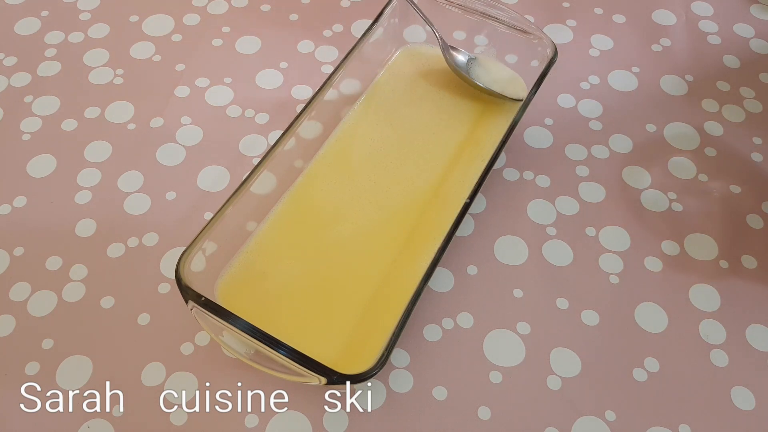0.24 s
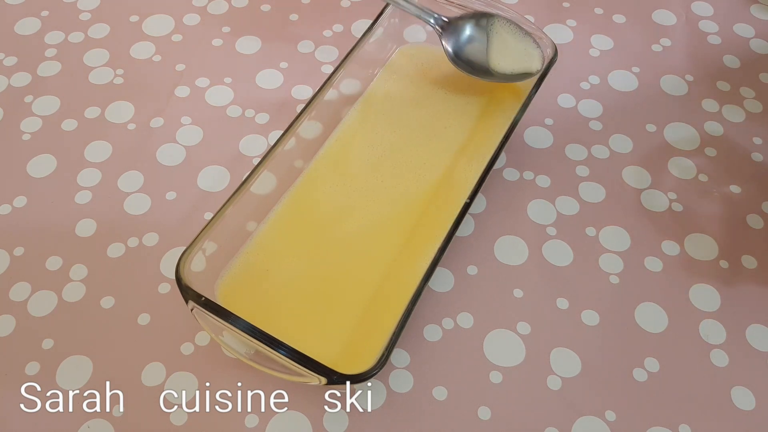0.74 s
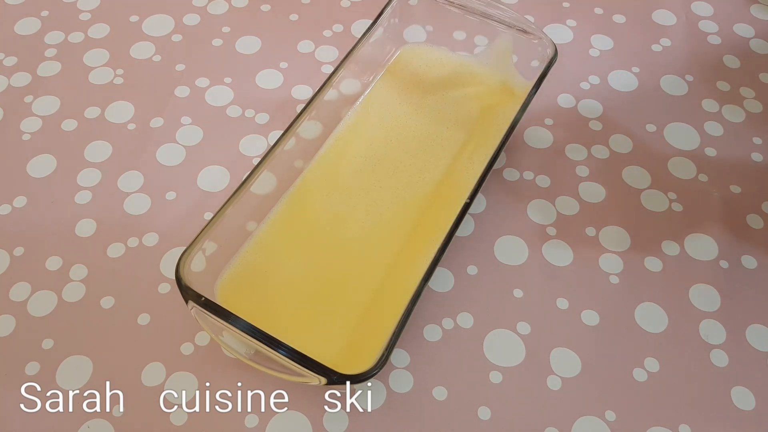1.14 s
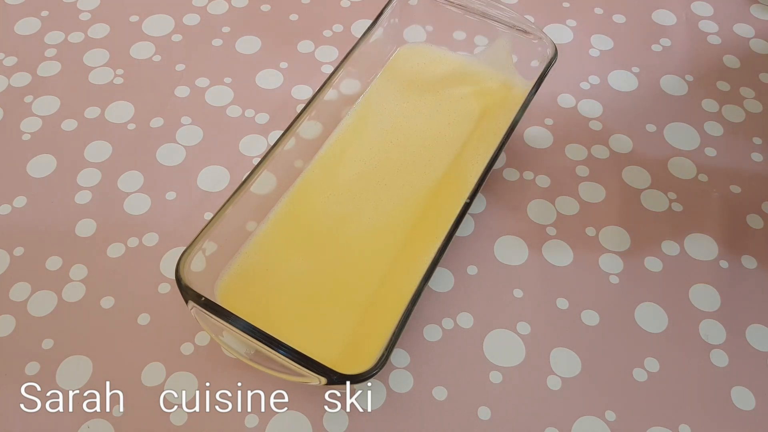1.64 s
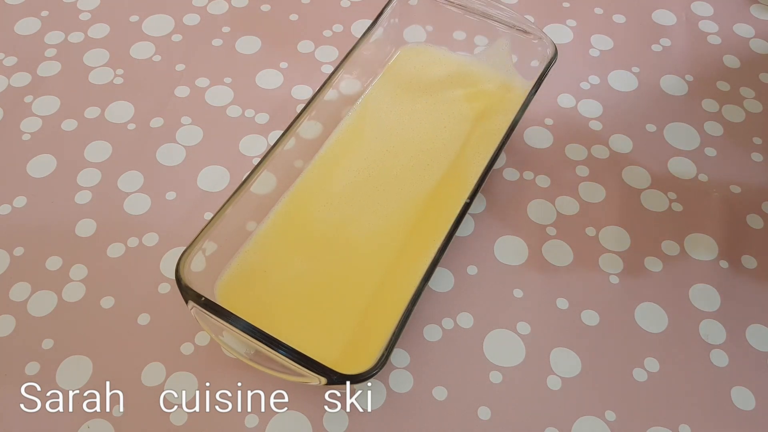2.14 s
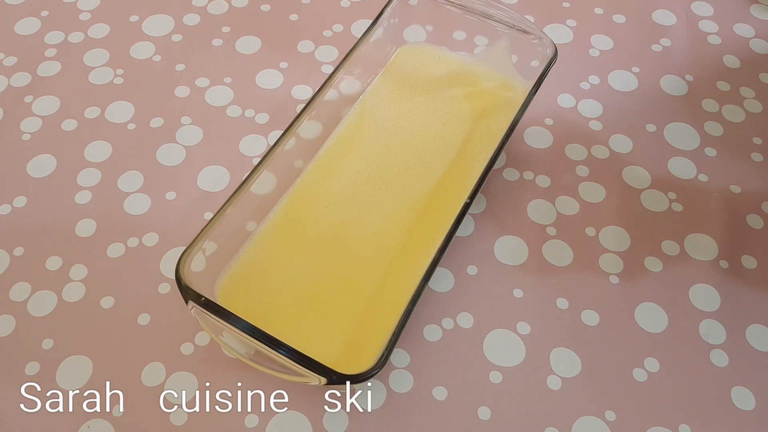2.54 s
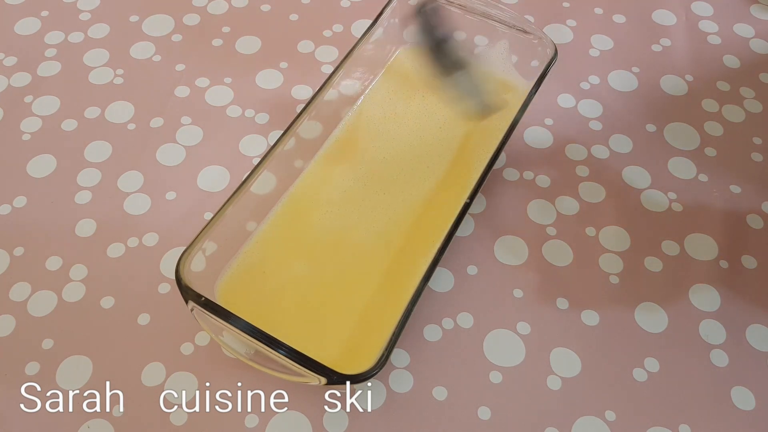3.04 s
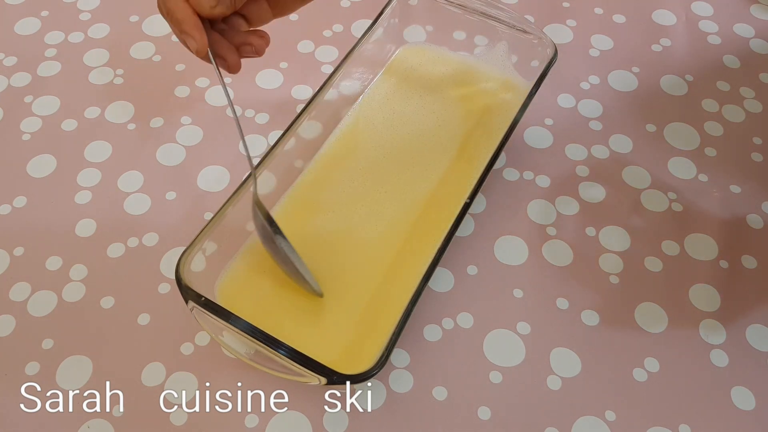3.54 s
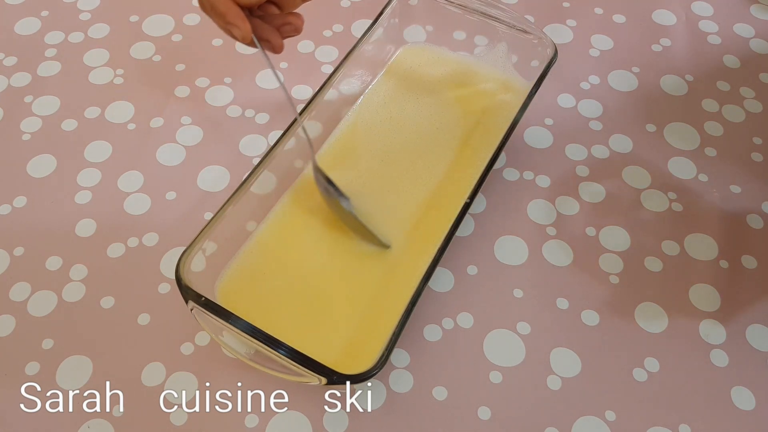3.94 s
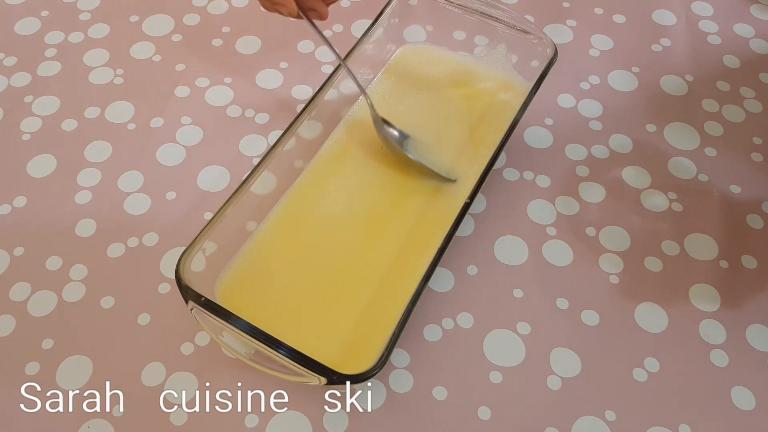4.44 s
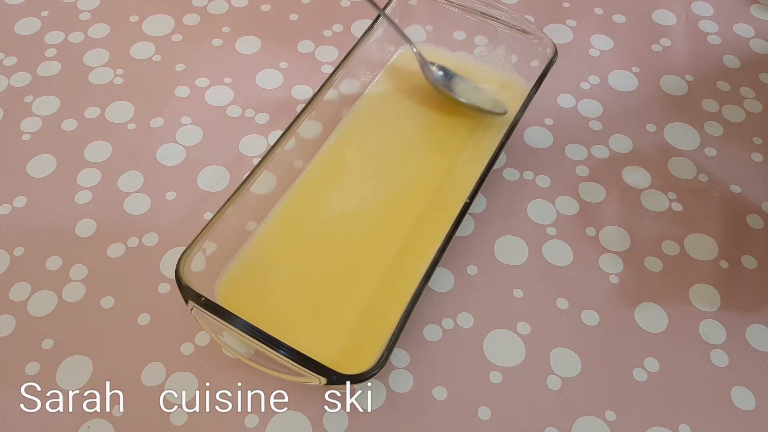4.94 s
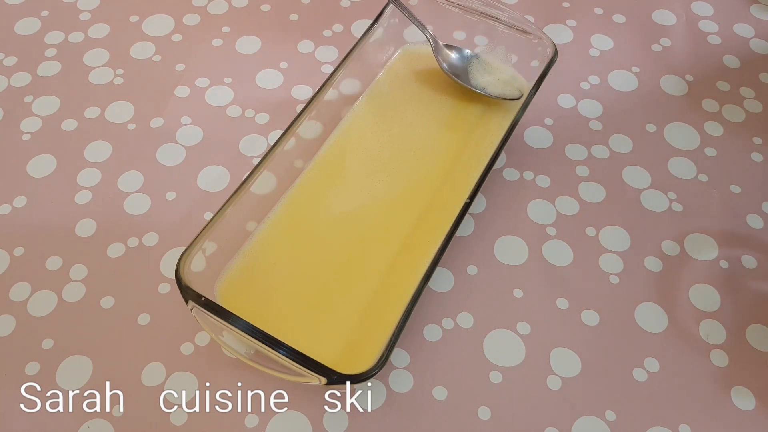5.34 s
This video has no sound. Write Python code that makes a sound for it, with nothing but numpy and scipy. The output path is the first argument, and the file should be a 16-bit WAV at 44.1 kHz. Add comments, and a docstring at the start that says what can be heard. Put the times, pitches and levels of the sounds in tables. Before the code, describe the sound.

Close stereo recording in a home kitchen with a low rumble. A spoon gives a quick irregular run of clinks on a filled glass dish, slightly left, then foam hisses faintly. Three sharp, evenly spaced raps on a rim follow to the right, and the background dips afterwards and slowly returns. Small birds chirp far off. Near the end come a soft metallic slide, a foam hiss and more dish clinks.

```python
"""A metal spoon skims foam off custard in a glass baking dish: it clinks against the wall, then the foam hisses.
The spoon is rapped clean three times on a rim off to the right; the recorder's gain sinks and creeps back.
Later something metal slides softly across the room, then the foam hisses and the dish clinks once more.
Throughout, a low rumble fills the kitchen and small birds call now and then, far off.
Knocks are cracks plus ringing modes, hisses are shaped noise, bird notes are gliding tones; rooms are echoes."""
import sys
import numpy as np
from scipy import signal
from scipy.fft import rfft, irfft
from scipy.io import wavfile
from scipy.ndimage import uniform_filter1d, minimum_filter1d

SR = 44100
rng = np.random.default_rng(int(sys.argv[2]) if len(sys.argv) > 2 else 0)


def store_wav(level_fs):
    """Save 16-bit WAV to argv[1]."""
    pcm = np.round(np.clip(np.atleast_2d(level_fs), -1, 1) * 32767)
    wavfile.write(sys.argv[1], SR, pcm.T.astype(np.int16))


N = 245895  # length in samples

# how long the kitchen's echoes take to die by 60 dB: (f/Hz, decay time/s)
KITCHEN_DECAY = [(200, 1), (1500, 0.54), (3500, 0.55), (6000, 0.53), (9000, 0.42), (14000, 0.27)]


def gain_of(db):
    """Turns decibels into an amplitude factor."""
    return 10 ** (np.asarray(db) / 20)


def evened(x):
    """Scales a sound to an rms of 1."""
    return x / np.sqrt(np.mean(x ** 2) + 1e-20)


def read(points, hz):
    """Reads a table between its points, along a log-frequency axis."""
    f, value = np.transpose(points)
    return np.interp(np.log(hz + 1), np.log(f + 1), value)


def add(mix, s, sound):
    """Adds a stereo sound to the mix at time s, in seconds."""
    part = mix[:, max(round(s * SR), 0):][:, :sound.shape[1]]
    part += sound[:, :part.shape[1]]


def panned(db):
    """Left and right gains for a level difference; positive leans left."""
    return gain_of([[db / 2], [-db / 2]])


def wander(rate_hz):
    """Slow random motion of rms 1: noise with its fast part smoothed away."""
    hz = np.fft.rfftfreq(N, 1 / SR)
    slow = rfft(rng.standard_normal(N)) * np.exp(-(hz / rate_hz) ** 2)
    return evened(irfft(slow, N))


def causal(db, size=4096):
    """The sharpest click with a given spectrum: minimum phase packs its energy at the start."""
    log_gain = np.log(gain_of(np.concatenate([db, db[-2:0:-1]])))
    spectrum = np.exp(np.conj(signal.hilbert(log_gain)))[:len(db)]
    return irfft(spectrum)[:size // 2]


def room(x, t60s, early_db, early_s, gap_s):
    """Sparse reflections of random sign: strong early ones from near surfaces, then a tail dying band by band."""
    taps = np.zeros((2, SR))
    # one reflection at a random place in every 10 samples
    at = np.arange(0, SR - 10, 10) + rng.integers(0, 10, (2, (SR - 1) // 10))
    np.put_along_axis(taps, at, rng.choice([-1., 1.], at.shape), 1)
    hz, t, bands = signal.stft(taps, SR, nperseg=256)
    decay = gain_of(-60 * t / read(t60s, hz)[:, None])
    tail = signal.istft(bands * decay, SR, nperseg=256)[1]
    t = np.arange(tail.shape[1]) / SR
    early = 1 + gain_of(early_db) * np.exp(-t / early_s)
    tail = tail / np.linalg.norm(tail[0]) * early * (t > gap_s)
    return signal.fftconvolve(x, tail, axes=1)[:, :N]


def drone():
    """A deep, wavering tone that swells from its resting level and sinks back."""
    # (peak t/s, level/dB, rise/(dB/s), fall/(dB/s))
    swells = [(2.22, -45.5, 19, 60), (4.65, -57, 21.5, 10)]
    pitch_hz, rest_db, waver_db = 42.4, -67, 2
    t = np.arange(N) / SR
    level = gain_of(rest_db)
    for s, db, rise, fall in swells:
        level = level + gain_of(db - np.maximum(rise * (s - t), fall * (t - s)))
    hz = pitch_hz * (1 + 0.013 * wander(3))
    tone = np.sqrt(2) * np.sin(2 * np.pi * np.cumsum(hz) / SR)
    return level * gain_of(waver_db * wander(rate_hz=4)) * tone


def hum():
    """Steady pitches that waver: each carrier is blurred by slow random motion."""
    # (f/Hz, level/dB)
    hum_lines = [(97, -55), (158, -57), (199, -59), (218, -60), (298, -66)]
    t = np.arange(N) / SR
    total = np.zeros(N)
    for f, db in hum_lines:
        motion = wander(8) + 1j * wander(8)
        total += gain_of(db) * (motion * np.exp(2j * np.pi * f * t)).real
    return total


def rumble():
    """Low rumble with faint hiss: noise coloured band by band, its level slightly patchy."""
    # colour of the noise: (f/Hz, relative level per Hz/dB)
    noise_colour = [(24, -42), (45, -10), (75, -15), (100, -4), (135, -6), (220, -4), (330, -9), (570, -7),
                    (760, -26), (1100, -26), (1700, -32), (2800, -37), (4300, -28), (5600, -36),
                    (7500, -42), (14000, -41)]
    # how alike the left and right sides are: (f/Hz, likeness from 0 to 1)
    likeness = [(40, 0.82), (140, 0.83), (280, 0.89), (600, 0.52), (1200, 0.1), (8000, 0.055)]
    frames, hz = N // 512 + 5, np.fft.rfftfreq(2048, 1 / SR)
    a, b, c, d, patches = rng.standard_normal((5, frames, len(hz)))
    patches = uniform_filter1d(patches, size=10, axis=0)
    patches = evened(uniform_filter1d(patches, size=8, axis=1))
    same = np.clip(read(likeness, hz), -1, 1)
    left = a + 1j * b
    right = same * left + np.sqrt(1 - same ** 2) * (c + 1j * d)
    bands = np.array([left, right]) * gain_of(read(noise_colour, hz) + 0.77 * patches)
    return evened(signal.istft(bands.transpose(0, 2, 1), nperseg=2048, noverlap=1536)[1][:, :N])


def background():
    """Rumble, hum and drone together, leaning slightly left."""
    return panned(1.2) * (gain_of(-50.0) * rumble() + hum() + drone())


def birds():
    """Diving chirps and drooping whistles: fluttering sine tones, far off and heard only as echo."""
    # one bird repeats a buzzy chirp that dives and levels off:
    # (t/s, length/s, start f/Hz, end f/Hz, level before the echo/dB)
    chirps = [(1.868, .125, 5700, 2750, -57), (3.157, .1, 5300, 2750, -57.5),
              (3.525, .13, 4900, 2850, -58.5), (4.855, .13, 5100, 2750, -59.5),
              (5.422, .15, 4800, 2850, -58)]
    # thin whistles, held and then dropped:
    # (t/s, length/s, f/Hz, drop as share of the pitch, buzz from 0 to 1, level before the echo/dB)
    whistles = [(.56, .14, 6300, .03, .035, -71), (.66, .14, 5600, .25, .11, -70),
                (1.09, .2, 5100, .2, .14, -71), (1.492, .068, 3650, .03, .055, -58),
                (1.64, .2, 2960, .01, .02, -79), (3.02, .15, 4900, .03, .1, -72),
                (3.36, .13, 4900, .13, .14, -70), (3.56, .22, 8800, .1, .06, -78),
                (3.63, .117, 3055, .0088, .015, -67), (3.775, .1, 5680, .01, .025, -77),
                (3.87, .12, 4950, .24, .04, -71)]
    # how long the outdoor echoes take to die by 60 dB: (f/Hz, decay time/s)
    yard_decay = [(2000, .65), (4000, .95), (8000, .65)]
    dive_s, dive_hold = .05, 1.4  # speed of a chirp's dive; a higher power delays it
    chirp_buzz, buzz_fade_s = 0.135, .085  # pitch flutter at the start, and how fast it clears
    whistle_hold = 2  # a higher power holds the pitch longer before the drop
    attack_s, release_s = 0.022, 0.025
    song, waver = np.zeros((2, N)), wander(rate_hz=590)

    def sing(s, t, hz, buzz, db):
        """One note: a fluttering sine with attack, hold and release."""
        hz = hz * (1 + buzz * np.roll(waver, -round(s * SR))[:len(t)])
        shape = np.minimum(t / attack_s, 1) * np.minimum((t[-1] - t) / release_s, 1)
        note = gain_of(db) * shape * np.sin(2 * np.pi * np.cumsum(hz) / SR)
        add(song, s, np.array([note, note]))

    for s, length, start_hz, end_hz, db in chirps:
        t = np.arange(0, length, 1 / SR)
        hz = end_hz + (start_hz - end_hz) * np.exp(-(t / dive_s) ** dive_hold)
        sing(s, t, hz, chirp_buzz * np.exp(-t / buzz_fade_s), db)
    for s, length, pitch_hz, drop, buzz, db in whistles:
        t = np.arange(0, length, 1 / SR)
        hz = pitch_hz * (1 - drop * (t / length) ** whistle_hold)
        sing(s, t, hz, buzz, db)
    return gain_of(11) * room(song, yard_decay, early_db=-2, early_s=0.035, gap_s=0.00033)


def slide():
    """Metal slides softly over metal across the room: friction hiss sings in a row of narrow modes."""
    # the one stroke: (start t/s, rise/s, hold/s, fall/(dB/s), direct level/dB)
    start, rise, hold, fall_db_per_s, db = (4.285, .08, .12, 90, -53)
    # colour of the friction: (f/Hz, relative level per Hz/dB)
    hiss_colour = [(500, -20), (1200, -6), (1800, 2), (2500, 5), (3000, -8), (4200, 1), (6000, -6),
                   (7100, -12), (7800, -6), (10000, -8), (14000, -13)]
    # modes that sing: (f/Hz, level over the hiss/dB)
    singing_modes = [(2540, 8), (3175, 8), (3910, 10), (5990, 11), (6290, 14), (6910, 13), (7560, 12),
                     (7970, 11), (8750, 10), (9650, 12), (10000, 13), (11000, 15), (11600, 12), (12000, 10)]
    width_hz = 22
    t, hz = np.arange(N) / SR, np.fft.rfftfreq(N, 1 / SR)
    singing = sum(gain_of(mode_db) / (1 + 2j * (hz - f) / width_hz) for f, mode_db in singing_modes)
    colour = gain_of(read(hiss_colour, hz)) * (1 + singing)
    rub = evened(irfft(rfft(rng.standard_normal((2, N))) * colour, N))
    onset = np.clip((t - start) / rise, 0, 1) ** 2
    fade_db = fall_db_per_s * np.maximum(t - start - rise - hold, 0)
    direct = rub * onset * gain_of(db - fade_db)
    return direct + gain_of(-3) * room(direct, KITCHEN_DECAY, early_db=-6, early_s=.02, gap_s=.004)


def foam(bursts_per_s=6000):
    """Countless tiny bubbles burst while the spoon pushes or lifts the foam: random clicks merge into a hiss."""
    # (peak t/s, rise/s, fall/s, level/dB)
    pushes = [(.8, 0.27, 0.26, -56.5), (5.24, 0.087, 0.037, -54)]
    # colour of the hiss: (f/Hz, relative level per Hz/dB)
    fizz_colour = [(500, -14), (950, -2), (1700, -10), (4500, 0), (8000, -12), (14000, -26)]
    t, hz = np.arange(N) / SR, np.fft.rfftfreq(N, 1 / SR)
    bursts = rng.standard_normal((2, N)) * (rng.random((2, N)) < bursts_per_s / SR)
    fizz = evened(irfft(rfft(bursts) * gain_of(read(fizz_colour, hz)), N))
    level = np.zeros(N)
    for s, rise, fall, db in pushes:
        level += gain_of(db) * np.exp(-np.maximum((s - t) / rise, (t - s) / fall) ** 2)
    return fizz * level


def blows(rows, modes, main_hz, crack, lean, crack_db, shiver_db, shiver_s, right_lead_ms, path_spread_s,
          wet_db, main_wet_db, early_db, early_s):
    """Each blow is a crack plus ringing modes; a softer contact leaves the high ones quiet."""
    in_step_hz, ring_attack_s = 3600, .0002  # modes well below this pitch start in step, higher ones at random
    direct, sent = np.zeros((2, N)), np.zeros((2, N))
    t, hz = np.arange(SR) / SR, np.fft.rfftfreq(4096, 1 / SR)
    mode_hz, mode_db, t60 = np.transpose(modes)
    decay = gain_of(mode_db[:, None] - 60 * t / t60[:, None])
    rings = decay * np.exp(2j * np.pi * mode_hz[:, None] * t) * (1 - np.exp(-t / ring_attack_s))
    is_main, is_high = abs(mode_hz / main_hz - 1) < .07, mode_hz > 4000
    left_lag_ms, right_lag_ms = max(right_lead_ms, 0), max(-right_lead_ms, 0)

    for s, db, bright_hz, hard_db, main_db, high_db in rows:
        def contact_db(f):
            """Treble lost to a soft contact."""
            return -10 * np.log10(1 + (f / bright_hz) ** 4)

        # close pairs of low modes start in step and then beat
        phase = (mode_hz / in_step_hz) ** 2 * rng.standard_normal(len(modes))
        path_s = path_spread_s * rng.standard_normal((2, 1))  # to each microphone
        turn = np.exp(1j * (phase - 2 * np.pi * mode_hz * path_s))
        # the contact weights the modes
        weight = gain_of(contact_db(mode_hz) + main_db * is_main + high_db * is_high) * turn
        main = ((weight * is_main) @ rings).real
        others = ((weight * ~is_main) @ rings).real
        # bending waves cross the object a few times, drawing the crack out into a shiver of milliseconds
        shiver = rng.standard_normal((2, len(t))) * np.exp(-t / shiver_s)
        shiver *= gain_of(shiver_db) / np.sqrt(shiver_s * SR / 2)
        shiver[:, 0] += 1
        click = causal(read(crack, hz) + contact_db(hz) + crack_db + hard_db)
        clatter = others + signal.oaconvolve(shiver, click[None], axes=1)[:, :len(t)]
        # the main ring is heard mostly direct, so its beats stay deep
        add(sent, s, gain_of(db) * (clatter + gain_of(main_wet_db) * main))
        for ear, lag_ms in zip(np.eye(2), (left_lag_ms, right_lag_ms)):
            add(direct, s + lag_ms / 1000, gain_of(db) * ear[:, None] * (clatter + main))

    lean_db = read(lean, np.fft.rfftfreq(2 * N, 1 / SR))
    direct = irfft(rfft(direct, 2 * N) * gain_of([lean_db / 2, -lean_db / 2]))[:, :N]
    return direct + gain_of(wet_db) * room(sent, KITCHEN_DECAY, early_db, early_s, gap_s=.002)


def rim_raps():
    """The steel spoon is rapped on a rim to the right: sharp cracks, each with a rebound, and fluttering modes."""
    # raps and rebounds: (t/s, relative level/dB, contact brightness f/Hz,
    # crack boost/dB, main mode boost/dB, high mode boost/dB)
    raps = [(2.2259, -8, 10500, 1, 0, 1), (2.2515, -20.5, 4500, -14, 13.5, -2),
            (2.3698, -7.5, 10000, 2, -1.5, 0), (2.3949, -11, 3900, -7, 7.5, -2),
            (2.5333, -9, 11500, 4.5, 0, 2), (2.55945, -24, 3500, -16, 11, 0)]
    # modes of the spoon, in close clusters that flutter: (f/Hz, relative level/dB, time to die by 60 dB/s)
    spoon_modes = [(1877, -13, .085), (1913, -14, .095), (1952, -16, .07), (1800, -22, .07),
                   (3396, -21, .06), (5266, -12.5, .11), (8725, -4, .035), (8795, -8, .05),
                   (10260, -19, .05), (13350, -21, .05), (14150, -23, .09), (4150, -17, .035),
                   (4830, -16, .05), (4980, -16, .05), (5120, -18, .04), (5450, -17, .04),
                   (6450, -13, .025), (8400, -14, .03), (8600, -11, .03), (8920, -15, .035),
                   (9170, -19, .05), (10080, -22, .035), (10430, -23, .035), (10750, -21, .04),
                   (13180, -25, .04), (13520, -24, .04)]
    # colour of the first crack of contact: (f/Hz, relative level/dB)
    rim_crack = [(100, -36), (700, -19), (1250, -20), (2200, -8), (3000, -1), (3600, -1), (4500, -8),
                 (5200, -4.5), (6400, -5), (7600, -27), (8500, -12), (9700, -26), (10600, -18),
                 (11800, -35), (13500, -26), (15000, -31)]
    # how far the direct sound leans left; negative leans right: (f/Hz, left-right difference/dB)
    rim_lean = [(1900, -3.5), (4000, -2), (9000, -3)]
    return blows(raps, spoon_modes, 1914, rim_crack, rim_lean, crack_db=29.5, shiver_db=-9, shiver_s=.0018,
                 right_lead_ms=.31, path_spread_s=.00002, wet_db=-8.5, main_wet_db=-1,
                 early_db=-5, early_s=.014)


def dish_clinks():
    """The spoon clinks on the filled glass dish: hard knocks, then chatter, and low modes beating in pairs."""
    # knocks: (t/s, relative level/dB, contact brightness f/Hz,
    # crack boost/dB, main mode boost/dB, high mode boost/dB)
    clinks = [(.0880, -24, 4200, 5, 2.5, 1.5), (.1432, -27.5, 2800, 1, 1.5, 2),
              (.2799, -17.5, 6000, 14, -3.5, -7), (.2895, -26, 5200, 14, -6, -6),
              (.2965, -28, 5200, 14, -10, -6), (.3432, -29, 2600, 2, -1, -6),
              (.4272, -24, 3500, 2.5, -.5, -4), (.930, -60, 9000, 6, -6, 0),
              (5.2544, -15, 5400, 10, -3.5, -8), (5.269, -31, 4500, 15, -8, -10),
              (5.2775, -18.5, 4800, 12, -6, -9), (5.2925, -26, 3200, 10, -6, -10),
              (5.5269, -13.5, 3500, 9, 2, 4)]
    # modes of the filled dish, a faint slow pair lingers: (f/Hz, relative level/dB, time to die by 60 dB/s)
    dish_modes = [(872, -20, .18), (903, -21, .12), (1547, -9.5, .075), (1567, -8, .085), (1557, -32, 1.15),
                  (1566.5, -32, 1.15), (1935, -15, .06), (1965, -16, .06), (2006, -14, .08),
                  (2043, -14.5, .08), (2336, -10, .06), (2374, -13, .05), (2342, -39, .8), (440, -23, .06),
                  (1335, -20, .05), (2130, -17, .04), (2620, -19, .03), (2900, -15, .04), (3030, -11, .06),
                  (3300, -16, .035), (3610, -15, .05), (4130, -13, .04), (4260, -11, .05), (4900, -18, .04),
                  (5330, -13, .06), (5720, -16, .035), (6060, -13, .035), (6700, -14, .03),
                  (9200, -17, .04), (10300, -16, .04), (13600, -19, .05), (14100, -17, .08)]
    # colour of the first crack of contact: (f/Hz, relative level/dB)
    dish_crack = [(100, -32), (450, -19), (750, -24), (1350, -17), (1760, -22), (1980, -8), (2350, -1.5),
                  (2750, -8), (3300, -10.5), (6200, -7), (8200, -18), (10500, -12), (12300, -24),
                  (15000, -21)]
    # how far the direct sound leans left; negative leans right: (f/Hz, left-right difference/dB)
    dish_lean = [(900, 6), (1550, 9), (2100, 2), (4000, 3.5), (9000, -1)]
    return blows(clinks, dish_modes, 1556, dish_crack, dish_lean, crack_db=15, shiver_db=5, shiver_s=.005,
                 right_lead_ms=-.045, path_spread_s=.00003, wet_db=-6, main_wet_db=-1.5,
                 early_db=0, early_s=.014)


def scene():
    """Background, birds, sliding metal, foam, rim raps and dish clinks together."""
    return background() + birds() + slide() + foam() + rim_raps() + dish_clinks()


def record(dry, limit_db=-17, depth_db=9.5, hold_s=0.73, attack_s=0.42, recovery_db_per_s=13):
    """Loud, bright sound turns the gain down; it holds, then creeps back. Then soft overload and the band limit."""
    edge_hz = 14500
    steps = np.diff(dry, prepend=0)  # sample-to-sample steps favour bright sound
    power = abs(uniform_filter1d((steps ** 2).mean(0), size=64))
    level_db = 10 * np.log10(power + 1e-12)
    wanted_db = depth_db * np.clip((level_db - limit_db) / 5, 0, 1)
    hold = 2 * round(hold_s * SR / 2) + 1
    # the largest cut wanted during the hold time just past
    held_db = -minimum_filter1d(-wanted_db, hold, origin=hold // 2, mode="constant")
    fall = np.arange(N) * recovery_db_per_s / SR
    creeping_db = np.maximum.accumulate(held_db + fall) - fall
    r = np.exp(-1 / (attack_s * SR))
    cut_db = signal.lfilter([1 - r], [1, -r], creeping_db)  # the gain moves gradually
    limited = .92 * np.tanh(dry / gain_of(cut_db) / .92)
    low_pass = signal.firwin(161, edge_hz, window=("kaiser", 8), fs=SR)
    return signal.oaconvolve(limited, low_pass[None], "same", axes=1)


dry = scene()
out = record(dry)
store_wav(out)
```